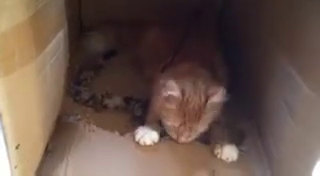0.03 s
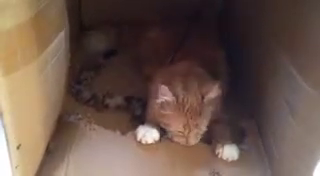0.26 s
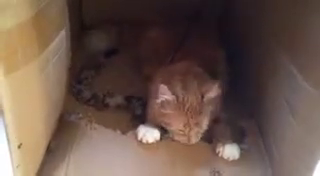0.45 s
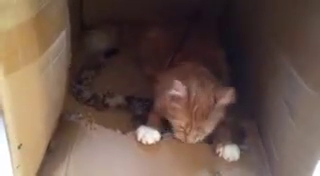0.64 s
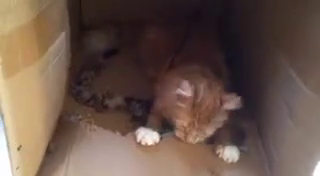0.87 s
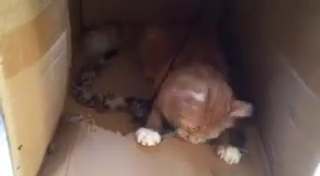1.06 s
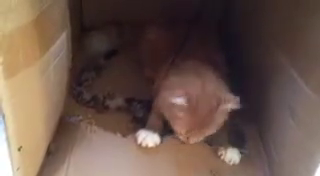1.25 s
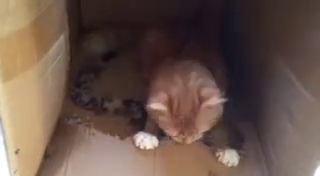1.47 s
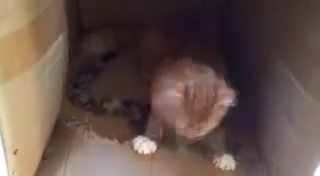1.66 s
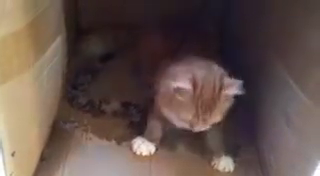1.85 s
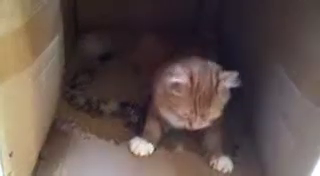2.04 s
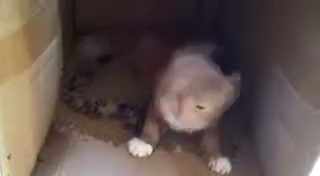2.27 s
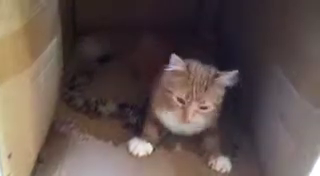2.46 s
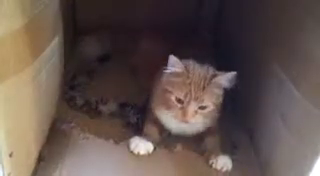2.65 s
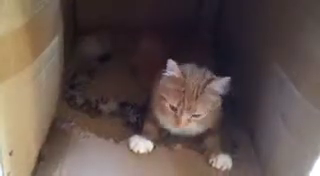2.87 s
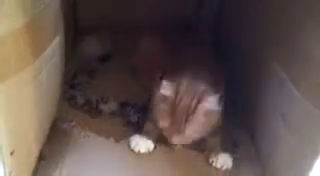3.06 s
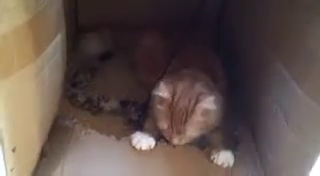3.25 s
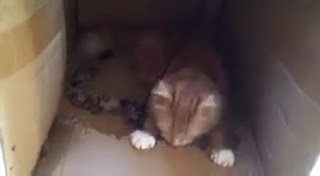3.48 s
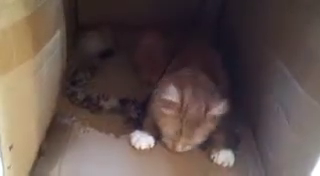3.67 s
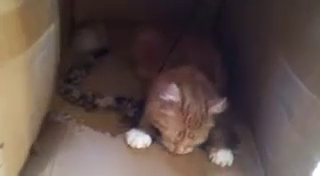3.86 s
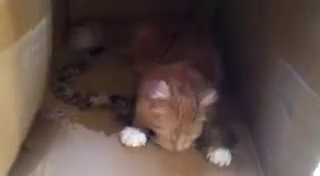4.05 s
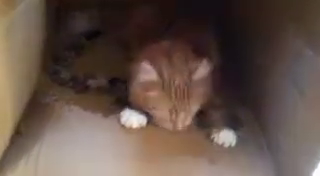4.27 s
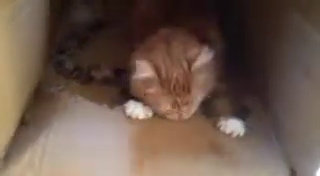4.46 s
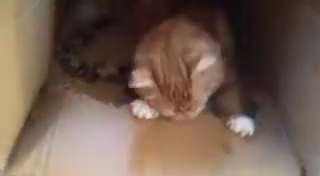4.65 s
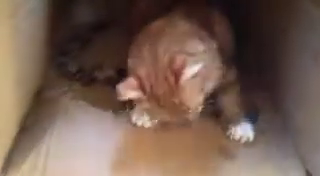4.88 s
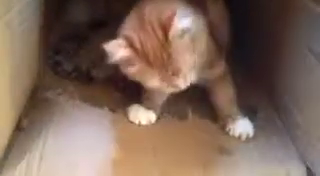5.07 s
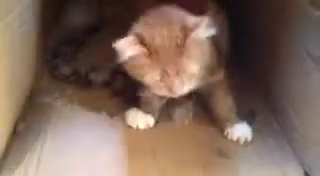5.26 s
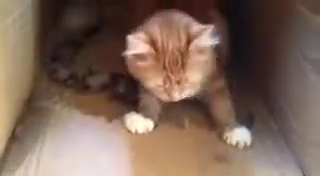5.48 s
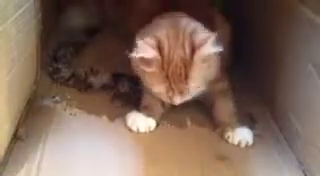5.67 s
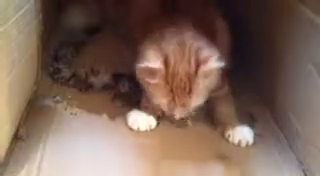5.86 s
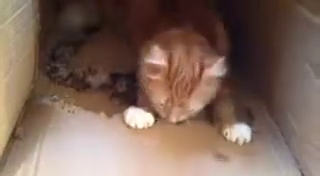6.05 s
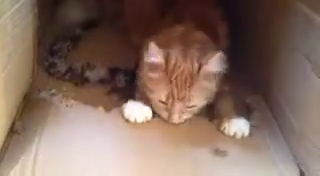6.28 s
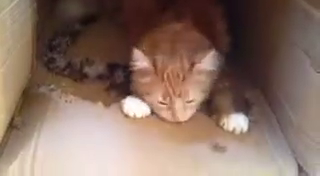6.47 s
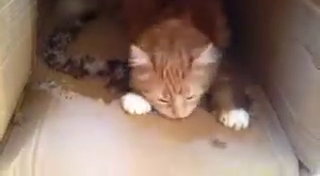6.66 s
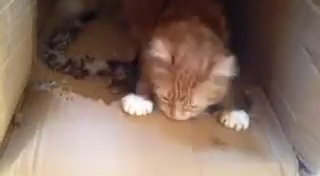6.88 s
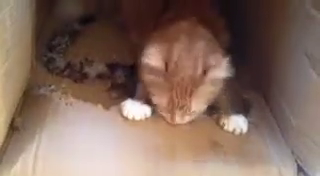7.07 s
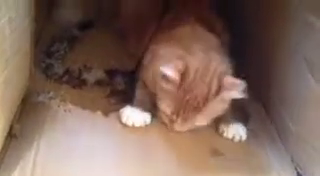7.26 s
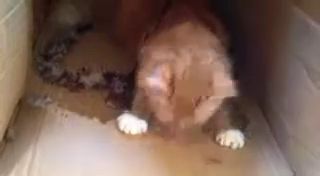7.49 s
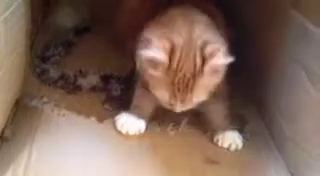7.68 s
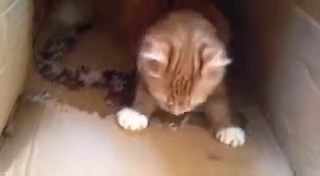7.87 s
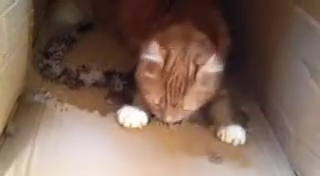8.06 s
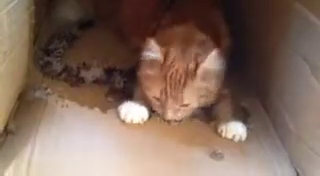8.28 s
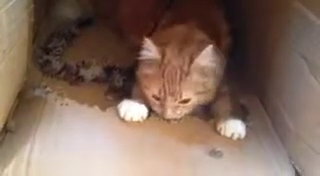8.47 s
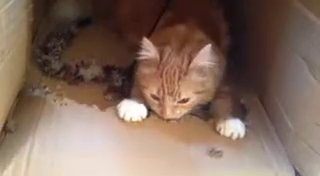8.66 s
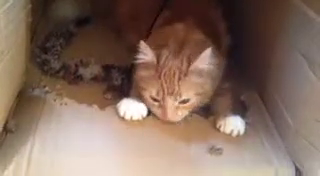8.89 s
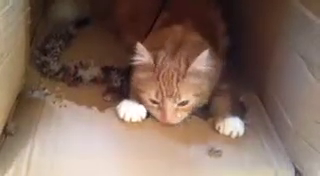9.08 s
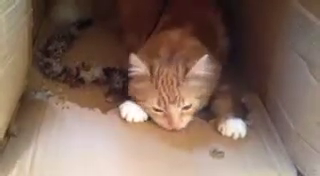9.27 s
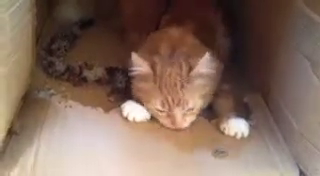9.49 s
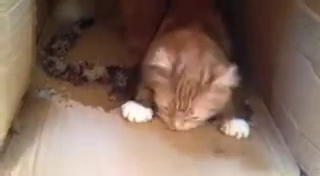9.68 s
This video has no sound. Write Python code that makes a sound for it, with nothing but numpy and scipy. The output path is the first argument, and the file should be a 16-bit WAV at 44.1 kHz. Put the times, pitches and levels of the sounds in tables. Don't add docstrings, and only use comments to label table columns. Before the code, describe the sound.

Close, boxy cardboard sounds in a small bare room, over quiet hiss and a faint distant rumble. From 0 to 1.6 seconds claws pull gently, with papery rustles, a few low panel bumps and light picks that ease off. At 1.7 a loud, hollow knock of several fused blows booms the box and rings briefly. From 2 to 3.3 it is nearly still, with tiny clicks and faint creaks. Scratching builds from 3.6, dense around 4.2 to 4.4, with crisp picks at 4.5 and 4.75 and a sharp, brighter snap at 4.9. After a tug at 5.05, sparse picks fade until 6. Harder crackling tears run from 6.4 to 7.3; a hard click at 7.4 leads to a booming clatter at 7.55. Light scratches follow, quiet near 8.6, then rips and firm clicks build from 9.2 to the end.

```python
import sys
import numpy as np
from scipy import signal
from scipy.io import wavfile

SR = 44100
rng = np.random.default_rng(int(sys.argv[2]) if len(sys.argv) > 2 else 0)


def how_loud(loudness_db):
    steps = np.asarray(loudness_db, float) / 20
    return 10 ** steps


def to_wav(sig):
    pcm = np.clip(np.atleast_2d(sig), -1, 1) * 32767
    pcm = np.round(pcm).astype(np.int16)
    wavfile.write(sys.argv[1], SR, pcm.T)


N = 429093


def rms_one(x):
    return x / np.sqrt(np.mean(x ** 2) + 1e-20)


def in_time(rows):
    time_s, *columns = np.transpose(rows)
    return [np.interp(np.arange(N) / SR, time_s, column) for column in columns]


def at_hz(points, hz, column=1):
    points = np.array(points)
    return np.interp(np.log(hz), np.log(points[:, 0]), points[:, column])


def band(x, low_hz, high_hz, order=2):
    return signal.sosfilt(signal.butter(order, [low_hz, high_hz], "band", fs=SR, output="sos"), x)


def resonate(x, peaks):
    out = 0
    for k, (hz, width_hz, level_db) in enumerate(peaks):
        r = np.exp(-np.pi * width_hz / SR)
        b = np.array([1, 0, -1]) * (1 - r * r) / 2
        a = [1, -2 * r * np.cos(2 * np.pi * hz / SR), r * r]
        out = out + (-1) ** k * how_loud(level_db) * signal.lfilter(b, a, x)
    return out


def crackle(shape, spread_db):
    size_db = spread_db * np.minimum(rng.exponential(1, shape), 5)
    return rms_one(rng.standard_normal(shape) * how_loud(size_db))


def drift(rate_hz):
    r = np.exp(-2 * np.pi * rate_hz / SR)
    return rms_one(signal.lfilter([1], [1, -2 * r, r * r], rng.standard_normal(N + SR))[SR:])


def background():
    # hz, density_db (per Hz)
    hiss_spectrum = [(25, -4), (84, -6.5), (176, 8.5), (306, -1.5), (600, -8.5), (1500, -8.5), (4000, -16),
                     (8000, -15.5), (11000, -20.5), (16000, -29.5)]
    # start_s, level_db
    rumble_curve = [(0, -88), (2.0, -77), (2.3, -74), (3.2, -71), (3.6, -89.5), (8.4, -77.5), (8.7, -76.5),
                    (9.0, -84)]
    edges_hz = 22 * 2 ** np.arange(0, 9.6, .5)
    white = rng.standard_normal((2, N))
    hiss = 0
    for k, (low_hz, high_hz) in enumerate(zip(edges_hz, edges_hz[1:])):
        gain_db = at_hz(hiss_spectrum, np.sqrt(low_hz * high_hz)) + 2.0 * drift(3.2)
        hiss = hiss + how_loud(gain_db) * band(white[k % 2], low_hz, high_hz)
    rumble = rms_one(resonate(rng.standard_normal(N), [(85, 6.4, 0)]))
    return how_loud(-64.5) * rms_one(hiss) + how_loud(in_time(rumble_curve)[0]) * rumble


def room(x):
    # hz, t60_s, tail_db
    decay = [(90, 0.13, -13.5), (205, 0.6, -2.5), (253, 0.74, -5), (320, 0.67, -12), (800, 0.9, -9.5),
             (1500, 0.78, -11), (4000, 0.8, -12), (9000, 0.27, -9.5)]
    edges_hz = 70 * 2 ** np.arange(0, 7.5, 1 / 3)
    white = rng.standard_normal((2, N))
    build_s = 0.0033
    build = np.exp(-1 / (build_s * SR))
    out = 0
    for k, (low_hz, high_hz) in enumerate(zip(edges_hz, edges_hz[1:])):
        hz = np.sqrt(low_hz * high_hz)
        t60_s, tail_db = at_hz(decay, hz, column=1), at_hz(decay, hz, column=2)
        keep = how_loud(-120 / (t60_s * SR))
        poles = np.convolve([1, -keep], [1, -build])
        stored = signal.lfilter([(1 - keep) * (1 - build)], poles, band(x, low_hz, high_hz) ** 2)
        out = out + how_loud(tail_db) * np.sqrt(np.abs(stored)) * rms_one(band(white[k % 2], low_hz, high_hz))
    return out


def box_air(x):
    # hz, width_hz, level_db
    cavity = [(414, 70, -4), (294, 86, -5.5), (616, 42, -3), (584, 8.1, -14.5), (1111, 80, -6.5),
              (1000, 35, -2.5), (1690, 38, -6), (1420, 330, -10.5)]
    return x + resonate(x, cavity)


def box_body(push):
    # hz, level_db, t60_s
    modes = [(210.7, 3, 0.045), (452, -4.5, 0.019), (198, -11.5, 0.073), (530, -1, 0.012), (236, -6, 0.067)]
    return resonate(push, [(hz, 2.2 / t60_s, level_db) for hz, level_db, t60_s in modes])


def board_colour(liner, fibre):
    # hz, width_hz, level_db
    liner_peaks = [(900, 346, 3.5), (1100, 230, -12), (1700, 59, -3), (2250, 190, -21), (2740, 670, -31.5)]
    # hz, width_hz, level_db
    fibre_peaks = [(4600, 140, 6.5), (6260, 890, -20), (7490, 720, 2), (9200, 1600, 3.5)]
    liner = 0.5 * resonate(liner, liner_peaks) + band(liner, 600, 2800, order=1)
    fibre = 0.15 * resonate(fibre, fibre_peaks) + band(fibre, 3200, 22000, order=1)
    return liner, fibre


def ticks(per_s):
    parting = rng.random(N) < per_s * how_loud(5 * drift(20)) / SR
    clicks = crackle(N, spread_db=4.5) * parting + 1e-18
    dealt = rng.integers(0, 12, N)
    out = 0
    for k, hz in enumerate(np.geomspace(600, 5500, 12)):
        out = out + resonate(clicks * (dealt == k), [(hz, hz / 4.0, 0)])
    return rms_one(out)


def pull():
    # start_s, pull_db, weight_db
    bouts = [
        [(0.0, -58.5, -10), (0.2, -55.5, -7.5), (0.5, -57.5, -7), (0.69, -52, -5.5), (0.95, -58, -9),
         (1.17, -58.5, -21), (1.27, -63, -23), (1.68, -59.5, -30)],
        [(2.1, -72, 0.5), (2.35, -84.5, 2), (2.84, -73, -6.5), (3.3, -62, -12.5), (3.78, -64, -6.5),
         (4.1, -55.5, -1.5), (4.4, -52, 0), (4.65, -51.5, -10), (4.92, -44, -21)],
        [(5.2, -62.5, -4), (5.5, -70, -5.5), (6.0, -62, -18), (6.36, -53, -9.5), (6.7, -64, 0),
         (6.92, -46, -4.5), (7.35, -54.5, -7), (7.5, -44, -8)],
        [(7.9, -68, -4), (8.15, -55, -8), (8.45, -63, -11), (8.76, -80, -1), (8.88, -62, -2), (9.06, -65, -7),
         (9.2, -48, -3), (9.34, -54, -4), (9.73, -43.5, -6)],
    ]
    fray_db, fray_before_s, fray_after_s = -15.5, 0.0084, 0.02
    pull_db, weight_db = in_time(np.vstack(bouts))
    marks = np.zeros(N)
    for start_s, crackle_db, *_ in tears():
        marks[round(start_s * SR)] = how_loud(2 * (crackle_db + fray_db))
    after = signal.lfilter([1], [1, -np.exp(-2 / (fray_after_s * SR))], marks)
    before = signal.lfilter([1], [1, -np.exp(-2 / (fray_before_s * SR))], marks[::-1])[::-1]
    return 10 * np.log10(how_loud(2 * pull_db) + after + before), weight_db


def straining():
    # hz, width_hz, level_db
    flex_modes = [(168.2, 32.3, 0.5), (192, 70, 1.5), (260.6, 73.6, 0.5), (379, 120, -6), (600, 100, -15.5)]
    rustle_db, weight_db = pull()
    bright_db = -4 - 0.44 * weight_db
    grains = crackle(N, spread_db=2.5) * how_loud(2.0 * drift(90))
    loose = crackle(N, spread_db=2.5) * how_loud(3.0 * drift(60))
    liner, fibre = board_colour(grains * how_loud(2.7 * drift(8.7)), loose)
    panel = rms_one(resonate(grains, flex_modes))
    rustle = rms_one(liner) + how_loud(bright_db) * rms_one(fibre) + how_loud(-10.0) * ticks(per_s=230)
    return how_loud(rustle_db - 5.0) * rustle + how_loud(rustle_db + weight_db + 2.5) * panel


def lasting(table, t60_s):
    lengths_s = np.broadcast_to(t60_s, len(table))
    return [(*row[:4], length_s, row[4]) for row, length_s in zip(table, lengths_s)]


def bursts(table, rise, spread_db, ring_db):
    lead = round(0.012 * SR)
    t = (np.arange(round(0.08 * SR)) - lead) / SR
    after = np.maximum(t, 0)
    force = np.full((3, N + len(t)), 1e-18)
    snaps = crackle((len(table), len(t)), spread_db)
    for (start_s, crackle_db, thump_db, bright_db, t60_s, ring_hz), run in zip(table, snaps):
        shape = (1 - np.exp(-after / (rise * t60_s))) * how_loud(-60 * after / t60_s)
        push = shape / np.sqrt(t60_s * 30) * (1 + 0.5 * np.tanh(run * shape))
        shape = shape + how_loud(-16) * np.exp(-np.abs(t) / (0.047 * t60_s))
        run = run * shape
        run = run / np.sqrt(np.sum(run ** 2) / np.sum(shape ** 2))
        rung = 0.88 * run + resonate(run, [(ring_hz, ring_hz / 6.7, ring_db)])
        liner, fibre = (run, rung) if ring_hz <= 4000 else (rung, run)
        liner, fibre = fibre, liner
        at = round(start_s * SR)
        gains = how_loud([[crackle_db], [crackle_db + bright_db], [thump_db]])
        force[:, at:at + len(t)] += gains * [liner, fibre, push]
    return force[:, lead:N + lead]


def tearing(table, rise, spread_db, ring_db, liner_db, fibre_db, panel_db, shake_db):
    liner, fibre, push = bursts(table, rise, spread_db, ring_db)
    liner, fibre = board_colour(liner, fibre)
    panel = box_body(band(push, 118, 3000, order=1)) + how_loud(shake_db) * push
    return how_loud(liner_db) * liner + how_loud(fibre_db) * fibre + how_loud(panel_db) * panel


def blows():
    # start_s, crackle_db, thump_db, bright_db, ring_hz
    snaps = [(1.692, -41, -38, -5, 900), (1.7006, -15, -6, -7.5, 1500), (1.706, -25, -4.5, -25, 900),
             (1.712, -12.5, -7.5, -8.5, 3000), (1.717, -26, -35, -20, 2780), (4.9201, -13, -22, -2, 1080),
             (4.9273, -15.5, -13, 4.5, 4430), (4.933, -18, -4, -11.5, 800),
             (4.9374, -17.5, -23, -6.5, 4500), (7.3799, -16.5, -27, -12.5, 440),
             (7.535, -43, -45, -4, 1000), (7.5368, -9, -31.5, -12, 5600), (7.541, -13, -14, -35.5, 1500),
             (7.5456, -17, -9, -30, 900), (7.550, -38.5, -14, -12, 700), (7.5536, -26.5, -14.5, -9, 2370)]
    # start_s, crackle_db, thump_db, bright_db, ring_hz
    clicks = [
        (2.8655, -46.5, -73, 7, 4540),
        (7.2172, -47, -70, 19.5, 7250),
        (7.3768, -12.5, -31, -0.5, 1100),
        (3.028, -63, -75, 9, 4700),
        (3.04, -61, -75, 14, 7200),
        (9.4105, -25, -43, 2.5, 2360),
        (9.7278, -30.5, -35, -2, 2980),
    ]
    length_s = 0.025 * how_loud(0.67 * (-14 - np.array(snaps)[:, 1]))
    return lasting(snaps, length_s) + lasting(clicks, 0.0085)


def tears():
    # start_s, crackle_db, thump_db, bright_db, ring_hz
    rips = [(0.022, -51.5, -38.5, -9, 1130), (0.195, -36.5, -28, -6.5, 1100),
            (0.529, -46.5, -59, -19, 2000), (0.61, -42.5, -38, -10, 1660), (0.811, -55.5, -58, 9.5, 6100),
            (0.92, -48, -74, -8, 1190), (1.472, -49, -68, 2.5, 8450), (2.319, -57.5, -70, 0.5, 736),
            (2.762, -58.5, -75, -4, 2440), (3.906, -42.5, -58.5, -7, 1890), (4.167, -35, -48, -6, 886),
            (4.496, -47, -57, 5.5, 5840), (4.822, -54, -63, 7.5, 3800), (4.84, -38.5, -58, -2, 1210),
            (6.461, -44.5, -49, -5, 1690), (6.949, -43, -47, -6, 630), (7.127, -36, -53, -11, 640),
            (7.241, -48.5, -52, 8, 1690), (7.31, -54, -64, 11, 1740), (7.957, -49.5, -63, -26, 1680),
            (8.793, -49, -48, -8, 1180), (8.861, -40.5, -50, -9, 1730), (9.2, -42, -50, -14, 1170),
            (9.558, -39, -48, 1, 820)]
    # start_s, crackle_db, thump_db, bright_db, ring_hz
    tugs = [(0.068, -59, -44, -11, 921), (0.683, -49.5, -33, 6, 895), (3.615, -53, -45, 4.5, 608),
            (3.962, -49.5, -62, -10, 910), (4.241, -36, -44, -23, 610), (4.257, -45, -43, -9, 624),
            (4.321, -33.5, -54, -11, 600), (5.05, -33, -28, -5, 795), (6.517, -39.5, -32.5, -25, 600),
            (6.596, -30.5, -40, -7.5, 580), (6.662, -26.5, -42, -2, 600), (6.708, -34, -51, -17, 600),
            (6.768, -29.5, -36, -10, 640), (7.269, -30.5, -38, -3.5, 600), (9.365, -37.5, -40.5, -7.5, 907),
            (9.672, -31.5, -32, -5, 900), (9.684, -27, -37, -6.5, 925), (3.335, -54, -65, 4, 900),
            (3.655, -51, -45, -5, 600), (4.05, -50, -51, -18, 450), (8.345, -46, -46, -16, 695),
            (9.175, -40, -43, -18, 600), (9.457, -33, -45, -6, 1000)]
    # start_s, crackle_db, thump_db, bright_db, ring_hz
    short_tears = [(0.657, -38, -44, -31, 1180), (3.141, -60, -57, 2.5, 7440),
                   (3.573, -45.5, -52, -2, 8440), (4.178, -29.5, -56, -2, 2110),
                   (4.19, -30.5, -34, -22, 1070), (4.284, -39, -55, -6, 1730),
                   (4.345, -37.5, -50, 2.5, 1190), (4.367, -29, -29.5, -17, 1710),
                   (4.393, -33.5, -60, -1, 1790), (4.868, -46, -58, 3, 7600), (6.341, -50, -41.5, 5, 1730),
                   (6.677, -28.5, -54, -19, 2850), (6.859, -31.5, -43, -5, 1110),
                   (6.905, -23.5, -32, -4, 1760), (7.052, -24.5, -48, -6.5, 1950),
                   (7.091, -33, -39, -5.5, 1970), (8.016, -47, -59, -19, 1690),
                   (8.057, -43.5, -51, -22, 1700), (8.175, -47, -58, -13, 1870),
                   (8.899, -34.5, -40, -16, 1186), (9.383, -28.5, -51, -6, 1140),
                   (9.439, -24.5, -45, -6, 1090), (9.531, -30, -36.5, -13, 2940),
                   (9.615, -30.5, -40, -14, 1070)]
    # start_s, crackle_db, bright_db, ring_hz
    surface_picks = [(0.777, -36.5, -7, 1620), (0.893, -57, 9, 6170), (1.095, -53.5, 6.5, 7900),
                     (1.28, -40.5, -10, 3840), (1.343, -39.5, -7.5, 7390), (1.38, -45.5, 4, 1800),
                     (1.432, -44, -2.5, 1530), (1.523, -48, 2, 8500), (1.626, -66.5, 18.5, 8150),
                     (2.199, -60.5, 9, 1090), (2.27, -51, -7, 842), (2.489, -48, -23, 826),
                     (2.87, -43.5, -27, 1840), (3.26, -61, 7, 7420), (3.295, -49, 6, 7300),
                     (3.422, -57, 7.5, 1560), (4.541, -22, -3.5, 5570), (4.64, -35, -15, 625),
                     (4.7, -32.5, 1, 1130), (4.753, -21, -7, 1210), (4.789, -41.5, -16, 654),
                     (5.418, -41.5, -2.5, 1050), (5.557, -40, -7.5, 3070), (5.741, -46, -2.5, 3770),
                     (5.884, -47, -10, 703), (5.956, -36, -34, 4000), (6.818, -36.5, -7, 664),
                     (6.883, -36, -4, 1700), (8.107, -37, -17, 1440), (8.285, -36.5, -16, 1860)]
    thump_db = -69
    picks = [(start_s, crackle_db, thump_db, bright_db, ring_hz)
             for start_s, crackle_db, bright_db, ring_hz in surface_picks]
    return lasting(rips, 0.088) + lasting(tugs, 0.046) + lasting(short_tears, 0.032) + lasting(picks, 0.025)


def scene():
    box = tearing(tears(), rise=0.048, spread_db=5.0, ring_db=6.5,
                  liner_db=3.5, fibre_db=5.5, panel_db=18, shake_db=-45)
    box = box + tearing(blows(), rise=0.054, spread_db=-0.5, ring_db=2.0,
                        liner_db=8.5, fibre_db=4, panel_db=14.5, shake_db=-28)
    box = box + room(box) + straining()
    return (box_air(box) + background())[None]


def roll_off(x):
    return signal.sosfilt(signal.butter(12, 12800, fs=SR, output="sos"), x)


def record(dry):
    rounded = 0.73 * np.tanh(dry / 0.88)
    heard = signal.sosfilt(signal.butter(3, 102, "high", fs=SR, output="sos"), rounded)
    heard = signal.sosfilt(signal.butter(9, 9170, fs=SR, output="sos"), heard)
    return roll_off(heard)


dry = scene()
out = record(dry)
to_wav(out)
```